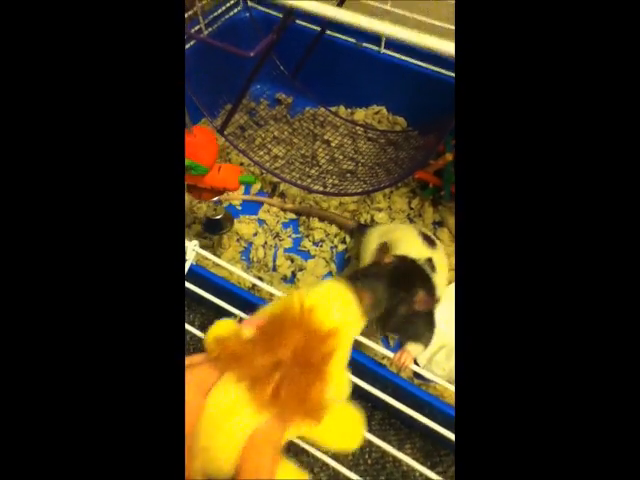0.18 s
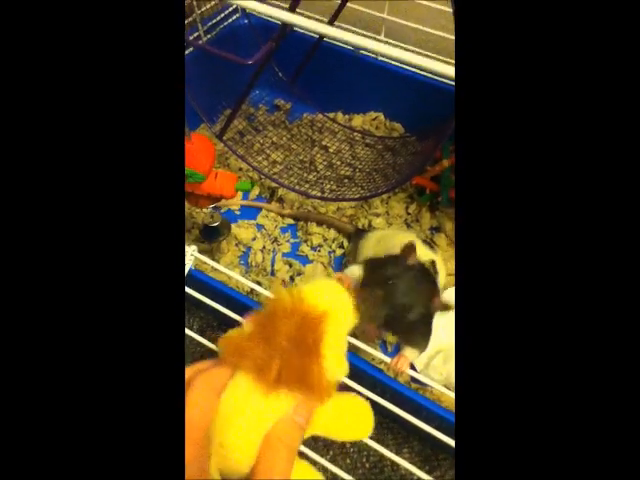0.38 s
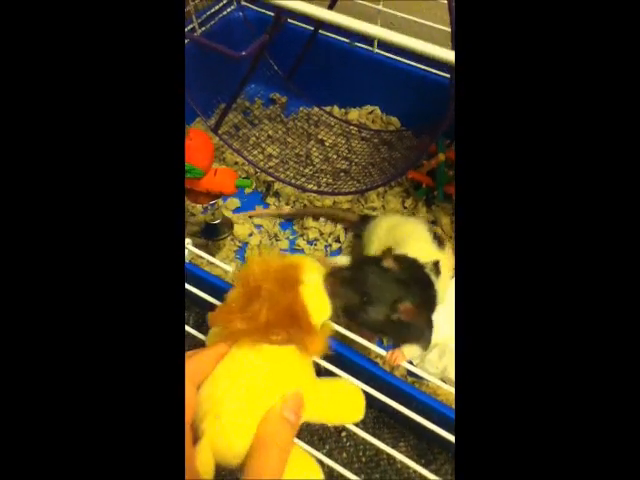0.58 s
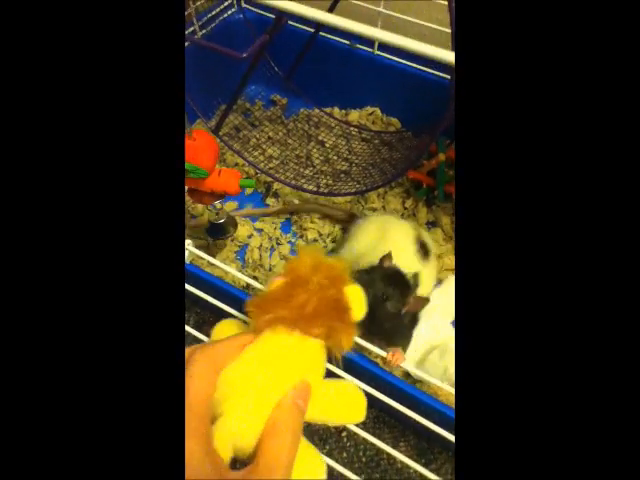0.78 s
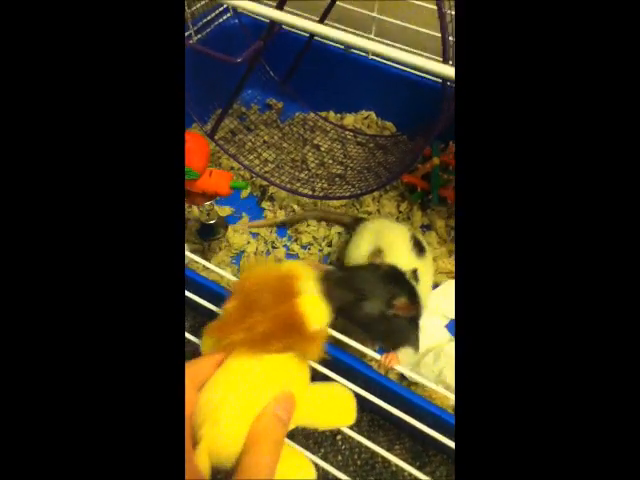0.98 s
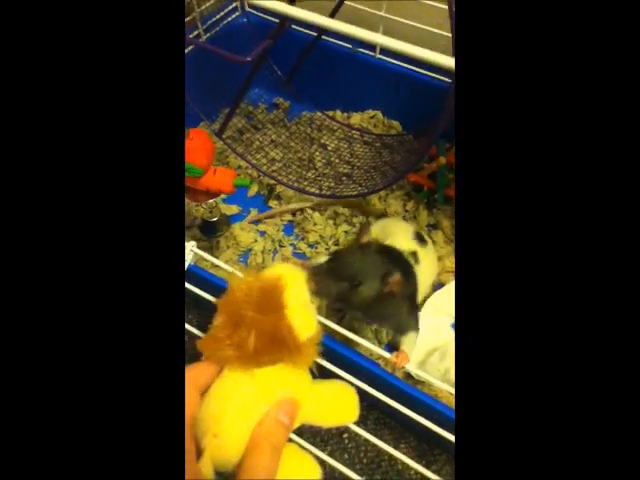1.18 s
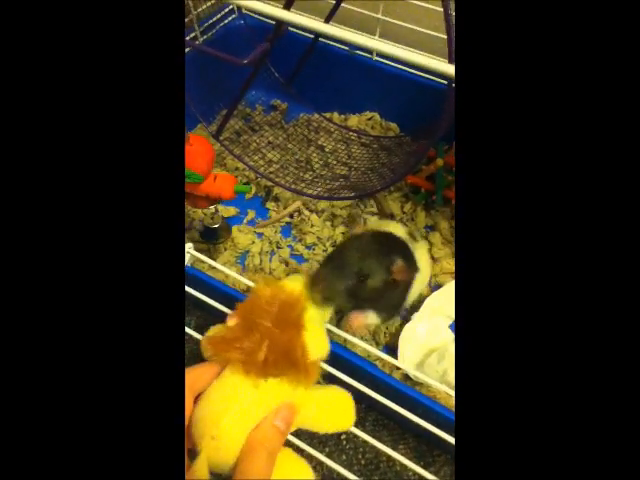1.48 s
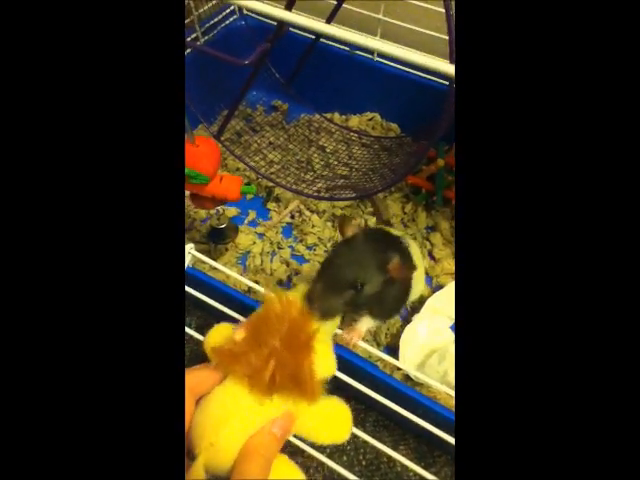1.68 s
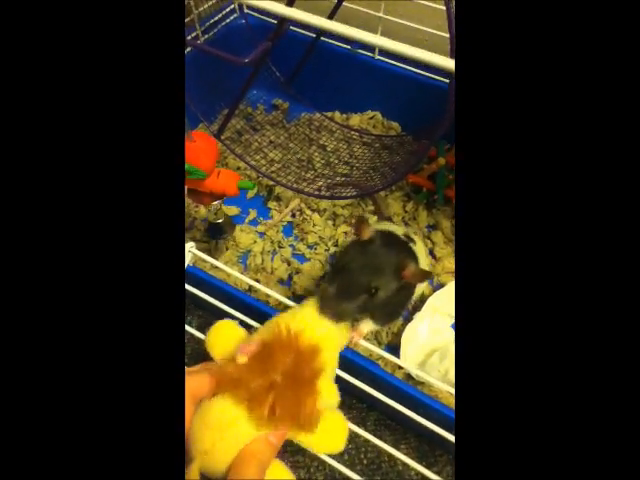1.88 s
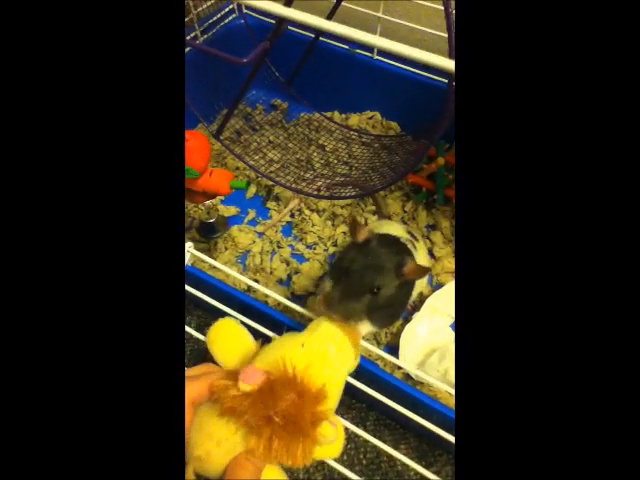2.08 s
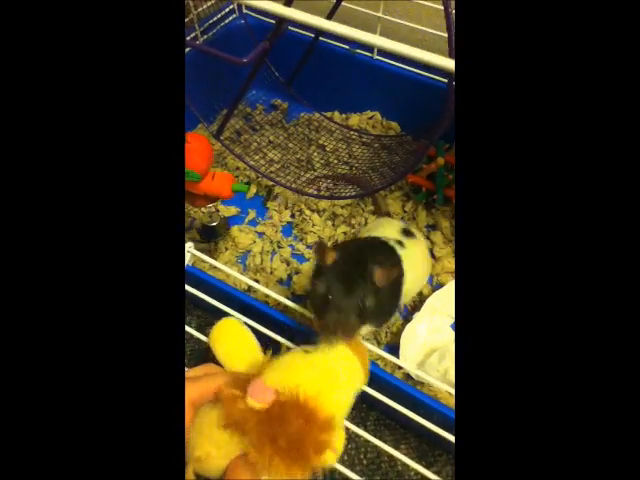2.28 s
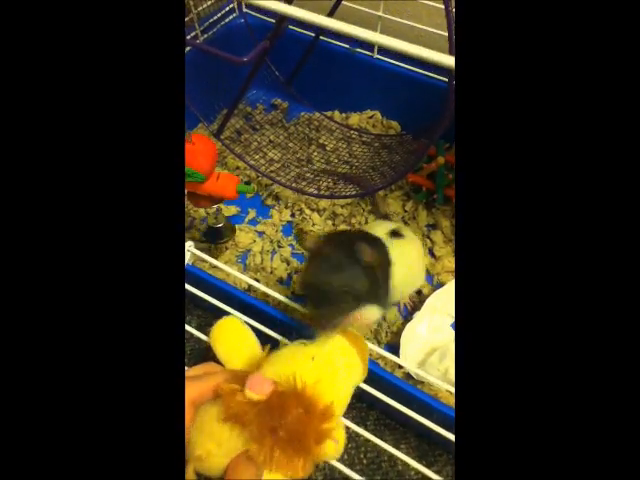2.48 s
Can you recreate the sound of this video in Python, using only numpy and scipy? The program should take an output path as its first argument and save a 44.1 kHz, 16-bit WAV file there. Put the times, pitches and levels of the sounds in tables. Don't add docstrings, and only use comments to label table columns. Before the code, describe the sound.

A pet rat gives one short sharp squeak, then cage clicks and bumps over fan hum

```python
import sys
import numpy as np
from scipy import signal
from scipy.io import wavfile
from scipy.ndimage import uniform_filter1d

SR = 44100
rng = np.random.default_rng(int(sys.argv[2]) if len(sys.argv) > 2 else 0)


def undo_db(level):
    steps = np.asarray(level, float) / 20
    return 10 ** steps


def output_pcm(signal):
    pcm = np.clip(np.atleast_2d(signal).T, -1, 1) * 32767
    wavfile.write(sys.argv[1], SR, np.round(pcm).astype(np.int16))


N = 114660


def evened(x):
    return x / np.sqrt(np.mean(x ** 2) + 1e-20)


def read(points, hz):
    f, value = np.transpose(points)
    return np.interp(np.log(hz + 1), np.log(f + 1), value)


def add(mix, s, sound):
    part = mix[max(round(s * SR), 0):][:len(sound)]
    part += sound[:len(part)]


def resonate(x, hz, width):
    turn = np.exp(2j * np.pi * hz * np.arange(len(x)) / SR)
    r = np.exp(-np.pi * width / SR)
    smooth = signal.lfilter([1 - r], [1, -r], x / turn)
    return 2 * (turn * smooth).real


def causal(db):
    log_gain = np.log(undo_db(np.concatenate([db, db[-2:0:-1]])))
    return np.fft.ifft(np.exp(np.conj(signal.hilbert(log_gain)))).real[:512]


def fan():
    # (f/Hz, level/dB per Hz)
    floor = [(25, -33.5), (60, -28), (100, -4), (200, -2), (400, -7), (700, -16.5), (2200, -20),
             (15900, -35.5)]
    # (f/Hz, width/Hz, level over the floor/dB)
    housing = [(107, 25, 3.5), (188, 40, 2), (342.6, 23, 4), (520, 80, 2), (915, 90, 9.5), (1368, 470, 7),
               (2570, 200, 4.5), (3500, 300, 6.5), (4610, 150, 6.5)]
    # (f/Hz, level/dB, wander/Hz)
    tones = [
        (905, -63, 5.4),
        (15020, -90, 1),
    ]
    floor_db, patch_db = -51.5, 0.8
    settle_db, settle_s = -2, 0.6

    frames, hz = N // 256 + 5, np.fft.rfftfreq(1024, 1 / SR)
    real, imag, patches = rng.standard_normal((frames, 513, 3)).T
    patches = uniform_filter1d(patches, size=12, axis=0)
    patches = evened(uniform_filter1d(patches, size=14, axis=1))
    colour = read(floor, hz) + sum(db / (1 + (2 * (hz - f) / w) ** 2) for f, w, db in housing)
    spectrum = (real + 1j * imag) * undo_db(colour[:, None] + patch_db * patches)
    noise = signal.istft(spectrum, nperseg=1024, noverlap=768)[1][:N]
    hum = undo_db(floor_db) * evened(noise)
    for f, db, width in tones:
        drift = uniform_filter1d(rng.standard_normal(N), size=1500)
        drift = evened(uniform_filter1d(drift, size=1500))
        level = undo_db(db + 1.5 * np.roll(drift, N // 2))
        hum += level * np.sqrt(2) * np.sin(2 * np.pi * np.cumsum(f + width * drift) / SR)
    return hum * undo_db(settle_db * np.exp(-np.arange(N) / SR / settle_s))


def sniff(middle, length, level_db, hz, width):
    air = resonate(rng.standard_normal(6000), hz, width)
    air = resonate(air, hz, width)[:round(length * SR)]
    return middle - length / 2, undo_db(level_db) * evened(air) * np.hanning(len(air))


def squeak():
    # (t/s, pulse rate/Hz)
    pitch = [
        (.2395, 1376),
        (.2413, 1376),
        (.2424, 1375),
        (.25, 1369),
        (.263, 1356),
        (.2755, 1324),
        (.283, 1262),
        (.2885, 1195),
        (.293, 1140),
    ]
    effort_db = [-44, -38, -16, -16.3, -16.5, -17.5, -22, -40, -60]
    bright_db = [0, 0, -.3, -.3, -0.12, 0, -.4, -.4, -.4]
    # (f/Hz, level/dB)
    throat_curve = [(1350, -16.5), (2700, -10.5), (4050, -16.5), (5400, -8.5), (6800, -10), (8200, 0),
                    (9400, -2), (12300, -36)]
    jitter, shimmer_db, breath_db = 0.002, 0.5, -24

    s, rate = np.transpose(pitch)
    t = np.arange(s[0], s[-1], 1 / SR)
    pitch_shake, level_shake = [evened(uniform_filter1d(rng.standard_normal(len(t)), size=60))
                                for _ in range(2)]
    turns = np.cumsum(np.interp(t, s, rate) * (1 + jitter * pitch_shake)) / SR
    bright = np.interp(t, s, bright_db)
    folds = evened(sum(undo_db(bright * (k - 5)) * np.cos(2 * np.pi * k * turns) for k in range(1, 12)))
    drive = folds * undo_db(shimmer_db * level_shake) + undo_db(breath_db) * rng.standard_normal(len(t))
    drive = drive * np.interp(t, s, undo_db(effort_db))

    hz = np.fft.rfftfreq(2048, 1 / SR)
    loss_above = np.clip((hz - 12500) * 0.03, 0, 50)
    loss_below = np.clip((1100 - hz) * 0.02, 0, 50)
    throat = causal(read(throat_curve, hz) - loss_above - loss_below)
    level = np.sqrt(np.mean(np.convolve(folds, throat) ** 2))
    return s[0], np.convolve(drive, throat) / level


def bump(s, level_db, length):
    # (f/Hz, level/dB, time to fall 60 dB/s)
    tray = [(290, -11, .04), (386.5, -1, 0.053), (500, -7, .03), (675, -5, .05), (757, -0.5, 0.07),
            (934, -6.5, .03), (1174, -7.5, .03), (1508, -13, 0.018), (2056, -13, .025), (2760, -12.5, .02),
            (3800, -11.5, .015)]
    t = np.arange(6000) / SR
    fade = np.clip(1.5 - t / length, 0, 1) * (t < 1.5 * length)
    knocks = rng.standard_normal(len(t)) * abs(rng.standard_normal(len(t))) * fade
    body = sum(undo_db(db - 60 * t / t60) * np.sin(2 * np.pi * hz * t) for hz, db, t60 in tray)
    sound = signal.fftconvolve(knocks, body)[:len(t)]
    sound = signal.lfilter(*signal.butter(2, 220, "high", fs=SR), sound)
    loud_part = sound[:round((length + 0.015) * SR)]
    return s, undo_db(level_db) * sound / np.sqrt(np.mean(loud_part ** 2))


def tick(s, peak_db, hz, t60):
    partials = [(.8, .3), (1, 1), (1.48, .6), (2.05, .2)]
    snap_db, scatter_db, scatter_t60 = -14, -15, 0.018
    soft_hz = 11000

    t = np.arange(1500) / SR
    tones = sum(share * np.sin(2 * np.pi * min(k * hz, 12000) * t) for k, share in partials)
    ring = undo_db(-60 * t / t60) * tones
    scatter = resonate(rng.standard_normal(len(t)), hz * 1.2, hz * 0.9)
    ring += undo_db(scatter_db - 60 * t / scatter_t60) * evened(scatter)
    ring[:3] += undo_db(snap_db) * np.array([1, -2, 1])
    band = [0.65 * hz, max(soft_hz, 1.5 * hz)]
    ring = signal.lfilter(*signal.butter(2, band, "band", fs=SR), ring)
    return s, undo_db(peak_db) * ring / abs(ring).max()


def drag(*row):
    crackle_db = 5
    s, air = sniff(*row)
    unevenness = evened(uniform_filter1d(rng.standard_normal(6000), size=30))
    return s, air * evened(undo_db(crackle_db * unevenness))[:len(air)]


def whistle(start, length, level_db, top_hz, fall_hz):
    u = np.arange(0, 1, 1 / (length * SR))
    hz = top_hz - fall_hz * (0.3 + 4 * (u - 0.48) ** 3 + 0.25 * (u - 0.48))
    return start, undo_db(level_db) * np.sin(np.pi * u) ** 0.6 * np.sin(2 * np.pi * np.cumsum(hz) / SR)


def room(x):
    # (f/Hz, time to fall 60 dB/s)
    decay = [(1000, .12), (2700, 0.16), (6000, .16), (10000, 0.11)]
    taps = np.zeros(SR // 2)
    at = np.arange(100, len(taps) - 20, 20)
    taps[at + rng.integers(0, 20, len(at))] = rng.choice([-1., 1.], len(at))
    hz, t, z = signal.stft(taps, SR, nperseg=128)
    t60 = np.maximum(read(decay, hz), 0.02)[:, None]
    tail = signal.istft(z * undo_db(-60 * t / t60), SR, nperseg=128)[1]
    return signal.fftconvolve(x, tail / np.linalg.norm(tail))[:N]


def scene():
    # (middle t/s, length/s, level/dB, centre f/Hz, width/Hz)
    sniffs = [
        (.005, .05, -66.5, 8700, 1600),
        (0.45, 0.078, -59.5, 8800, 1700),
        (0.721, .04, -55, 1200, 580),
        (1.27, .04, -66, 9500, 2500),
        (1.7, .05, -68, 11200, 4000),
        (1.61, .07, -63.5, 9000, 3500),
        (1.1, .06, -54.5, 108, 60),
        (0.99, .02, -43, 740, 170),
    ]
    # (t/s, level/dB, scrape length/s)
    bumps = [(0.98, -48, 0.004), (.8935, -37, 0.0068), (.903, -34.5, 0.0087), (.945, -42, .002),
             (.927, -50, 0.007), (0.83, -55.5, 0.034), (1.118, -51.5, 0.0026), (0.99, -58, 0.027),
             (0.595, -56, .006), (1.065, -55.5, 0.0037), (.25, -52, 0.0302)]
    # (t/s, peak level/dB, ring f/Hz, time to fall 60 dB/s)
    ticks = [(.337, -22, 2870, 0.0032), (.601, -44.5, 2870, 0.0057), (.763, -46, 5200, 0.0054),
             (.8558, -24.5, 4340, 0.0077), (0.8559, -27.5, 2110, 0.013), (0.8957, -41, 4500, .004),
             (0.8975, -27, 1994, 0.014), (0.9, -45, 6700, 0.0097), (.902, -33, 7200, 0.0036),
             (.907, -38, 3940, 0.0068), (.9115, -31, 5970, 0.0044), (.9443, -29.5, 4840, 0.0027),
             (.9455, -29.5, 2400, 0.0057), (1.067, -41, 2180, 0.0056), (1.08, -45, 4490, 0.0056),
             (1.092, -47, 2930, .008), (1.119, -37, 1980, 0.013), (1.612, -45.5, 4300, 0.0049),
             (1.733, -43.5, 3860, 0.0077), (1.8325, -36.5, 2930, .005), (1.8355, -35.5, 3600, 0.0068),
             (1.8408, -28, 3020, 0.0044), (1.843, -30, 2450, 0.0079), (1.9328, -36.5, 3470, 0.0053),
             (1.9358, -36, 3300, 0.0028), (1.9398, -32.5, 3350, .004)]
    # (middle t/s, length/s, level/dB, centre f/Hz, width/Hz)
    drags = [
        (.872, .05, -51, 2500, 4000),
        (.905, .032, -45, 4000, 6000),
        (.93, .07, -51, 3000, 5000),
        (.975, .1, -56, 2000, 3000),
    ]
    # (start t/s, length/s, level/dB, f a tenth of the way in/Hz, fall from there to the end/Hz)
    whistles = [
        (1.172, .026, -57, 9150, 1500),
        (1.2385, .006, -56, 9200, 2200),
    ]
    room_db = -20.5

    hum, cage = fan(), np.zeros(N)
    add(cage, *squeak())
    for source, rows in ((sniff, sniffs), (bump, bumps), (tick, ticks), (drag, drags), (whistle, whistles)):
        for row in rows:
            add(cage, *source(*row))
    return (cage + undo_db(room_db) * room(cage) + hum)[None]


def top_cut(x):
    return signal.sosfilt(signal.butter(12, 16090, fs=SR, output="sos"), x)


def record(dry):
    edge_hz = 16050
    mix = signal.oaconvolve(dry, signal.firwin(255, edge_hz, fs=SR)[None], "same")
    return top_cut(mix)


dry = scene()
out = record(dry)
output_pcm(out)
```